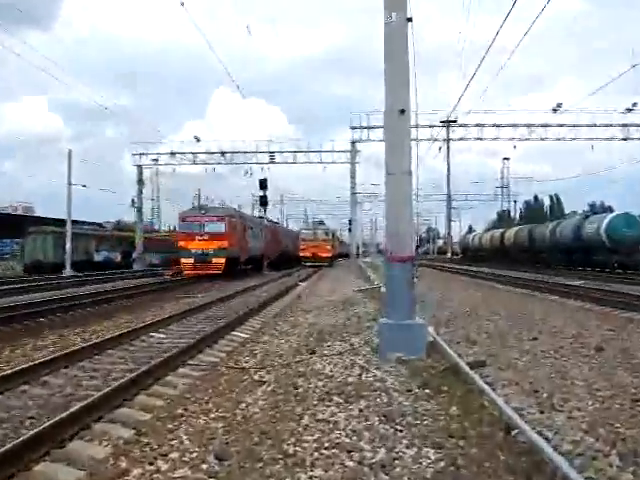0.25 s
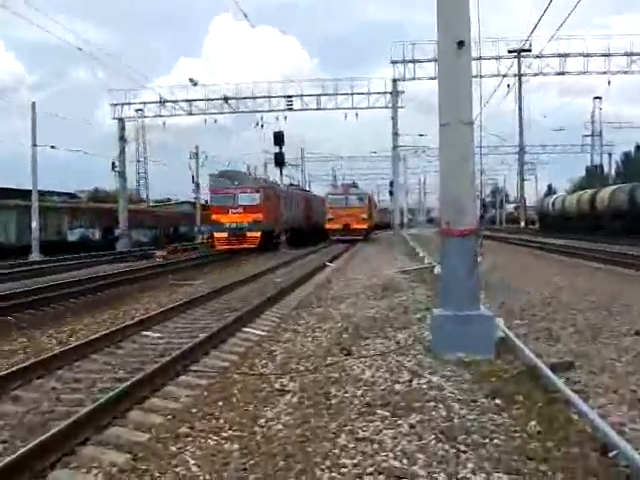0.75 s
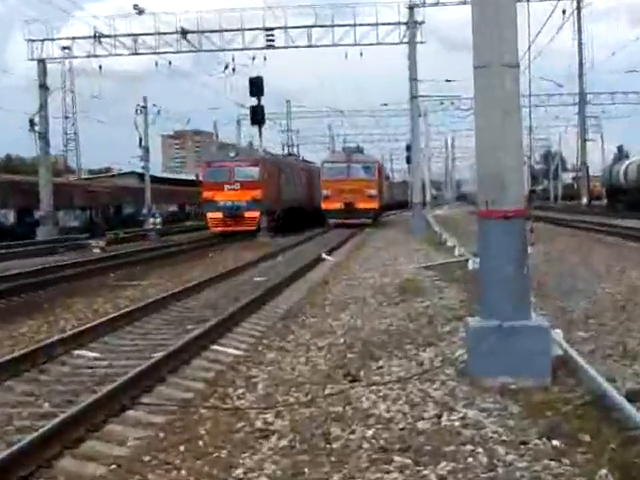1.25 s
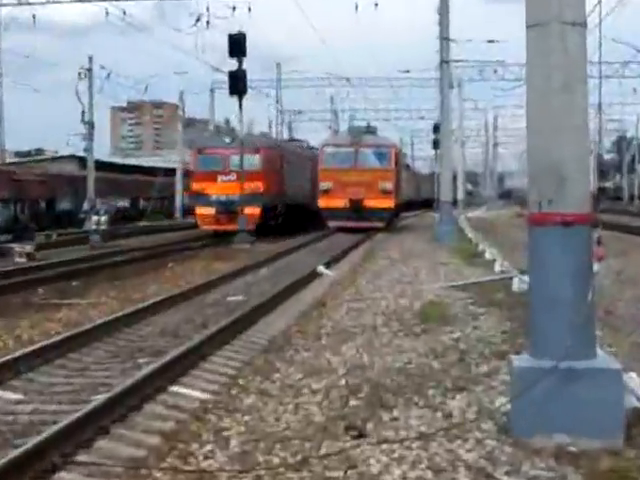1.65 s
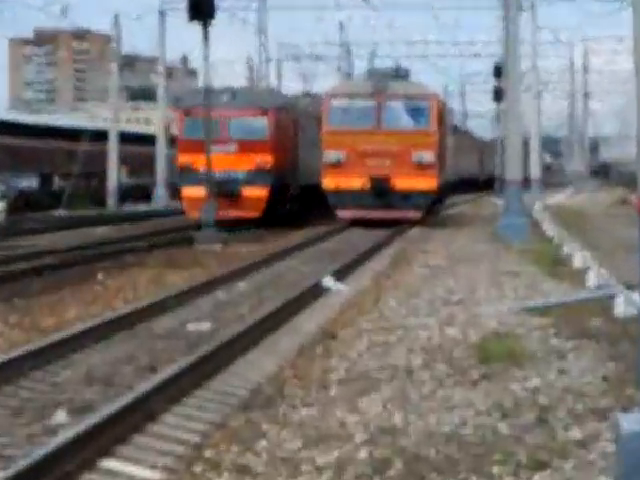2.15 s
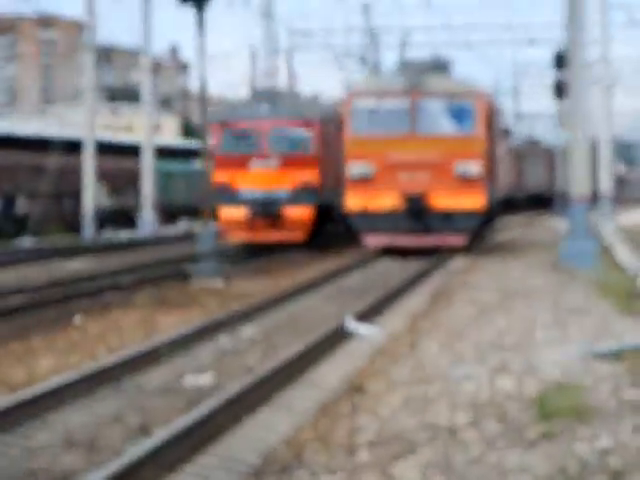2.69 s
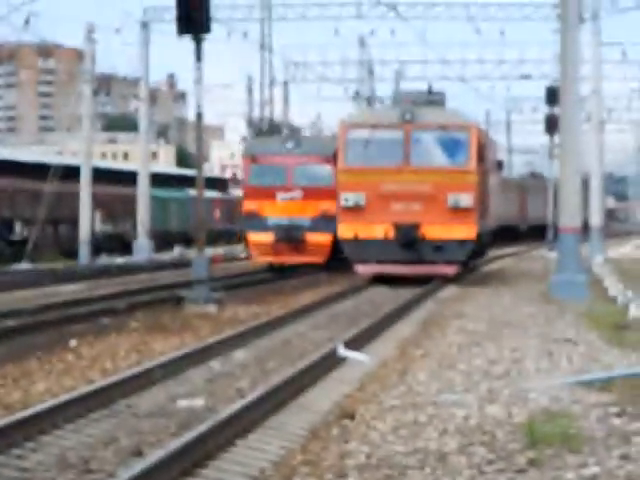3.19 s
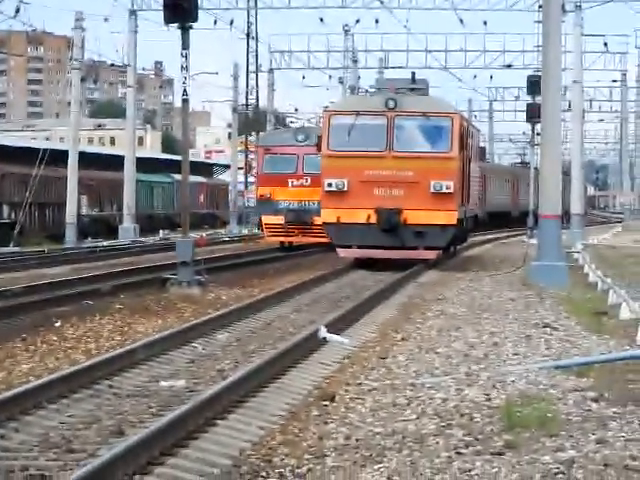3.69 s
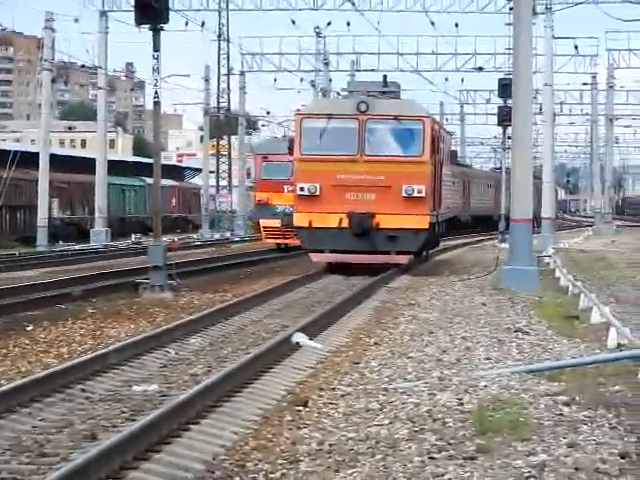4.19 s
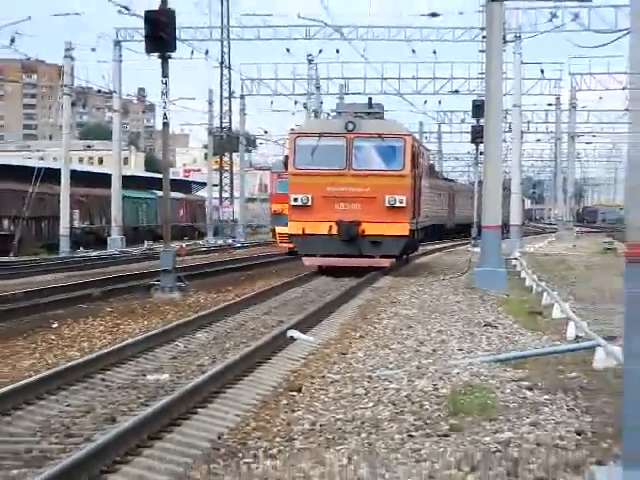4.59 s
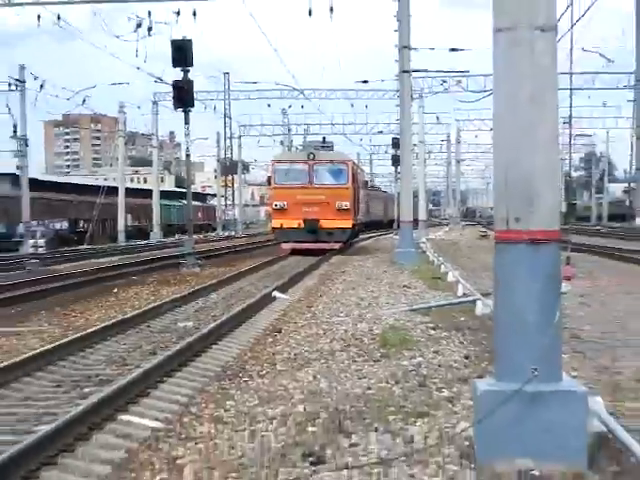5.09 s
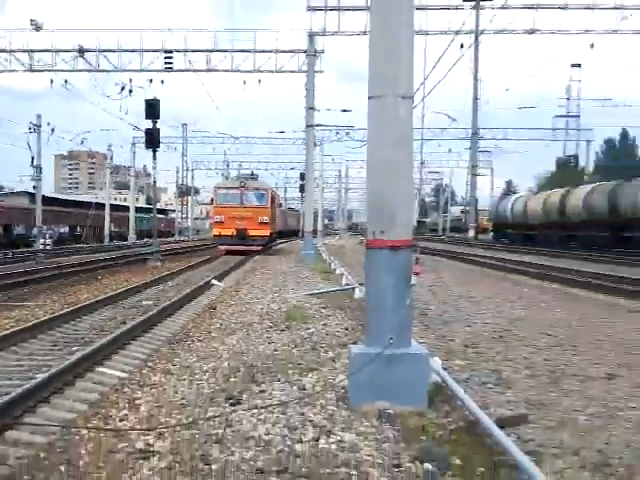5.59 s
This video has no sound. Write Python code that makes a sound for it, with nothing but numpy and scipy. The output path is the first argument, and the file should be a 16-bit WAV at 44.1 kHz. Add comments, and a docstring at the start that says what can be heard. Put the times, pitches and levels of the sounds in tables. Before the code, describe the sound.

Electric trains roar steadily through an open rail yard, with wind buffeting the microphone and a sharp camera-body click midway that briefly dips the sound.

```python
"""Electric trains roll through a station yard, heard from beside the track on a hand-held camera.
Wheels roar, rails sing and hiss over sleeper boom and a low rumble: shaped noises tied to one rolling level.
Midway the camera body clicks, as cracks that ring its modes; gain control ducks all, then slowly recovers.
Gusts buffet the two microphone ports: short swings of pressure amid rough turbulence."""
import sys
import numpy as np
from scipy import signal
from scipy.fft import rfft, irfft
from scipy.io import wavfile
from scipy.ndimage import uniform_filter1d, minimum_filter1d

SR = 44100
rng = np.random.default_rng(int(sys.argv[2]) if len(sys.argv) > 2 else 0)


def wrap_up_sound(samples):
    """Save the sound to the file named by the first command line argument, as 16-bit audio."""
    columns = np.atleast_2d(samples).T
    # keep every value between -1 and 1, then stretch to whole-number steps
    tamed = np.clip(columns, -1, 1)
    steps = np.round(tamed * 32767).astype(np.int16)
    wavfile.write(sys.argv[1], SR, steps)


N = 257972
HOP = 256  # samples between noise frames
FRAME_S = np.arange(N // HOP + 5) * HOP / SR
BIN_HZ = np.fft.rfftfreq(8 * HOP, 1 / SR)


def gain_of(db):
    """Decibels to a factor."""
    return 10 ** (np.asarray(db) / 20)


def evened(x):
    """Scales to an rms of one."""
    return x / np.sqrt(np.mean(x ** 2) + 1e-20)


def drift(frames):
    """Slow random curve over the noise frames, smoothed over so many frames, rms one."""
    return evened(uniform_filter1d(rng.standard_normal(len(FRAME_S)), size=frames))


def read(points, hz):
    """Reads a table on a log-frequency axis."""
    f, value = np.transpose(points)
    return np.interp(np.log(hz + 1), np.log(f + 1), value)


def bumps(rows, hz):
    """The dB curve of a set of resonances or dips."""
    return sum(db / (1 + (2 * (hz - f) / width) ** 2) for f, width, db in rows)


def band(points):
    """A spectrum in dB that falls a further 40 dB per octave above its last point."""
    top_hz = points[-1][0]
    skirt_db = 40 * np.log2(np.maximum(BIN_HZ / top_hz, 1))
    return (read(points, BIN_HZ) - skirt_db)[:, None]


def pan(left_over_right_db):
    """Column of left and right gains for an L-R difference."""
    return gain_of([[left_over_right_db / 2], [-left_over_right_db / 2]])


def add(mix, s, sound):
    """Mixes a stereo sound in at time s."""
    part = mix[:, max(round(s * SR), 0):][:, :sound.shape[1]]
    part += sound[:, :part.shape[1]]


def trains():
    """Rough wheels on rough rail shake cars, sleepers, wheels, rails and contact patch, all by one level."""
    # loudness of the wheels on the rails: t/s, level/dB
    rolling_level = [(0.0, -28), (0.17, -28), (0.37, -26.5), (0.46, -24), (0.53, -25), (0.62, -25),
                     (0.86, -26.5), (1.0, -27.5), (1.15, -28), (2.2, -29), (2.8, -29), (3.1, -27.5),
                     (3.5, -30.5), (3.7, -31.5), (4.0, -31), (4.3, -32), (4.7, -33.5), (5.85, -34.5)]
    cruise_db = -30  # rolling level at which each layer has its base level
    t = np.arange(N) / SR
    swell_db = np.interp(t, *np.transpose(rolling_level)) - cruise_db
    layers = [wheel_roar, rail_singing, contact_hiss, sleeper_boom, car_rumble]
    return sum(layer(t, swell_db) for layer in layers)


def wheel_roar(t, swell_db):
    """Wheels radiate broadband roar with resonances that waver and flare, plus brief surges."""
    # roar spectrum: f/Hz, level/(dB per Hz)
    roar_colour = [(150, -15), (300, -12.5), (380, -4.5), (440, -6.5), (520, 0.5), (610, -0.5), (700, 0),
                   (800, -2), (950, 0), (1100, -5), (1300, -16), (2000, -34)]
    # wheel resonances: f/Hz, width/Hz, height over the roar/dB
    wheel_modes = [(611, 41, 4), (884, 40, 0)]
    # surges: middle t/s, half length/s, lift/dB
    surges = [(0.66, 0.16, 0.5), (3.08, 0.055, 1.3), (3.673, 0.07, 5), (3.9, 0.1, 2.6), (4.365, 0.16, 2.5)]
    waver = 1 + 0.019 * drift(frames=70)  # share of the pitch, rms
    flare = 1 + 0.19 * drift(frames=25)  # share of the height in dB, rms
    colour_db = band(roar_colour) + flare * bumps(wheel_modes, BIN_HZ[:, None] / waver)
    surge_db = sum(db * np.exp(-((t - s) / half) ** 2) for s, half, db in surges)
    return rush(colour_db, -30.5 + swell_db + surge_db, patchy_db=0.57, flutter_db=0.27)


def rail_singing(t, swell_db):
    """Rails sing in the upper midrange, louder while the oncoming train draws near."""
    # singing spectrum: f/Hz, level/(dB per Hz)
    singing_colour = [(700, -34.5), (1100, -0.5), (1350, -2), (1650, 0), (2000, -2), (2250, -1), (2450, -5),
                      (2750, -3.5), (3050, -9), (3350, -9.5), (4200, -15)]
    start_s, rise_s, end_s, fall_s = 2.2, 0.42, 4.64, 0.17
    lift_db, growth_db_per_s = 2, 0.6
    nearing = np.clip(np.minimum((t - start_s) / rise_s, (end_s - t) / fall_s), 0, 1)
    near_db = nearing * (lift_db + growth_db_per_s * (t - start_s))
    return rush(band(singing_colour), -33.5 + 1.16 * swell_db + near_db, patchy_db=0.46, flutter_db=0.5)


def contact_hiss(t, swell_db):
    """The contact patch hisses, progressively shaded as one train slips behind the other."""
    # hiss spectrum: f/Hz, level/(dB per Hz)
    hiss_colour = [(2000, -30.5), (2800, 3.5), (3400, -2), (3900, -1), (4450, -2.5), (5000, 2.5),
                   (5500, 4.5), (5800, -2.5), (6200, -5.5), (6550, -3.5), (7250, -18), (7900, -16.5),
                   (8400, -39), (9500, -61.5)]
    shade_start_s, shade_s, shade_depth_db = 1.23, 2.35, -5
    shade_db = shade_depth_db * np.clip((t - shade_start_s) / shade_s, 0, 1)
    return rush(band(hiss_colour), -34 + 1.11 * swell_db + shade_db, patchy_db=0.5, flutter_db=0.5)


def sleeper_boom(t, swell_db):
    """Sleepers boom in the low midrange, rising 1.9 dB per dB of rolling."""
    # boom spectrum: f/Hz, level/(dB per Hz)
    boom_colour = [(200, -20.5), (290, -1.5), (380, -5), (460, 2), (560, -16.5), (800, -34.5)]
    return rush(band(boom_colour), -41 + 1.9 * swell_db, patchy_db=1.0, flutter_db=0.8)


def car_rumble(t, swell_db):
    """Shaken cars rumble, building at the start and following the rolling only weakly."""
    # rumble spectrum: f/Hz, level/(dB per Hz)
    rumble_colour = [(15, -29.5), (31, -20), (41, -0.5), (54, -0.5), (70, 0), (100, -3.5), (135, -5),
                     (185, -10), (225, -2), (275, -11.5), (325, -7), (420, -21), (700, -37.5)]
    start_db, build_s = -6, 0.26
    build_db = start_db * np.maximum(1 - t / build_s, 0)
    return rush(band(rumble_colour), -29 + 0.37 * swell_db + build_db, patchy_db=0.33, flutter_db=0.0)


def rush(colour_db, level_db, patchy_db, flutter_db):
    """Noise of one colour from down the track, with drifting patches, as the two ports hear it."""
    # left-right likeness: f/Hz, likeness/1
    likeness = [(50, 0.97), (200, 1), (800, 1), (1200, 0.72), (2000, 0.8), (3700, 0.67), (5500, 0.64),
                (8000, 0.35)]
    # phase by which left leads: f/Hz, lead/rad
    lead = [(0, 0.042), (1640, 0.23), (2070, 0.14), (3010, 0.32), (3270, 0.035), (3530, 0.039),
            (4050, 0.35), (4910, 0.1), (5430, 0.034), (5940, 0.55), (7580, 0.4)]
    # stereo balance: f/Hz, L-R/dB
    balance = [(60, -6.5), (100, -1), (170, -4.5), (300, -3.5), (510, -3.5), (870, -3.5), (1480, -1.5),
               (2530, -2.5), (4320, 0), (7380, -1.0)]
    a, b, c, d, patches = rng.standard_normal((len(FRAME_S), len(BIN_HZ), 5)).T
    patches = uniform_filter1d(patches, size=24, axis=0)  # across bins
    patches = evened(uniform_filter1d(patches, size=14, axis=1))  # across frames
    flutter = drift(frames=10)
    same = np.clip(read(likeness, BIN_HZ), -1, 1)[:, None]
    near = a + 1j * b
    far = same * near + np.sqrt(1 - same ** 2) * (c + 1j * d)
    lean = gain_of(read(balance, BIN_HZ) / 2)[:, None]
    turn = np.exp(1j * read(lead, BIN_HZ))[:, None]
    spectra = np.array([near * lean * turn, far / lean])
    spectra *= gain_of(colour_db + patchy_db * patches + flutter_db * flutter)
    noise = signal.istft(spectra, nperseg=8 * HOP, noverlap=7 * HOP)[1][:, :N]
    return evened(noise) * gain_of(level_db)


def camera_clicks(crack_s=0.00045, crack_hz=7000, rise_s=0.00032, aside_db=7):
    """Each knock is a brief crack that rings the body, aside_db less per octave away from its own pitch."""
    # knocks: t/s, peak/dB, knock f/Hz, crack against ring/dB
    clicks = [(2.4005, -12.5, 2000, -28), (2.4145, 6, 1400, -3), (2.4413, 0, 4500, -10)]
    # camera body modes: f/Hz, level/dB, t60/s
    case_modes = [(650, -2, 0.0042), (1100, 3, 0.0057), (2180, -6, 0.005), (2900, -11, 0.0054),
                  (3800, -5, 0.005), (4400, -9, 0.004), (5220, -13, 0.016), (5340, -1, 0.005),
                  (6760, -8, 0.0032)]
    port_slip_cycles = 0.07  # random phase spread of a mode between the ports
    out, t = np.zeros((2, N)), np.arange(SR // 20) / SR
    for s, db, knock_hz, crack_db in clicks:
        ring = np.zeros((2, len(t)))
        for hz, mode_db, t60 in case_modes:
            octaves_off = abs(np.log2(hz / knock_hz))
            envelope = gain_of(mode_db - aside_db * octaves_off - 60 * t / t60)
            phase_cycles = rng.random() + port_slip_cycles * rng.standard_normal((2, 1))
            ring += envelope * np.sin(2 * np.pi * (hz * t + phase_cycles))
        ring *= 1 - np.exp(-t / rise_s)
        crack = rng.standard_normal((2, len(t))) * t * np.exp(-t / crack_s)
        edges_hz = [min(knock_hz, crack_hz) / 2, crack_hz]
        crack = signal.sosfilt(signal.butter(2, edges_hz, "band", fs=SR, output="sos"), crack)
        knock = ring / abs(ring).max() + gain_of(crack_db) * crack / abs(crack).max()
        add(out, s, gain_of(db) * knock / abs(knock).max())
    return out


def wind(skew_rad=0.41, ragged_db=-15, wake=1.94):
    """Each buffet is an eddy crossing the ports: a swing or two of pressure in a wider turbulent wake."""
    # buffets: t/s, level/dB, eddy f/Hz, L-R/dB
    buffets = [(0.449, -20, 85, -3), (0.525, -23, 90, -3), (0.611, -24, 80, -5), (0.742, -22, 165, -1),
               (1.024, -16.5, 197, -2), (1.209, -17, 112, 7), (1.244, -21, 80, -4), (1.317, -22, 80, -16),
               (1.355, -22, 148, -12), (1.384, -21.5, 80, -12), (1.424, -16, 136, -4), (1.439, -15, 78, -7),
               (2.153, -17, 137, -3), (2.329, -20, 105, 1), (2.666, -17, 120, 6), (2.771, -22, 90, 4),
               (3.12, -15.5, 113, 4), (3.138, -21, 70, -4), (3.202, -17, 204, 7), (3.504, -19, 60, -3),
               (3.589, -11.5, 230, 11.5), (3.619, -16.5, 129, 9.5), (3.668, -14.5, 158, 8),
               (3.693, -15.5, 149, 5), (3.735, -18, 215, 14), (3.864, -15.5, 150, -12),
               (3.916, -23, 85, -9.5), (4.305, -20.5, 75, -6), (4.331, -22, 96, -15), (4.372, -21, 90, -3),
               (4.659, -22.5, 125, 2), (4.68, -17, 163, 5), (4.739, -26, 100, -1), (5.012, -25, 170, -2),
               (5.157, -21.5, 60, -1)]
    eddy_cycles = 0.66  # swings from the middle to where the envelope is 1/e
    out, t = np.zeros((2, N)), np.arange(-SR // 10, SR // 10) / SR
    for s, db, hz, pan_db in list(buffets) + puffs():
        turns = hz * t
        phase = 2 * np.pi * rng.random() + skew_rad * rng.standard_normal((2, 1))
        swing = np.cos(2 * np.pi * turns + phase) * np.exp(-(turns / eddy_cycles) ** 2)
        churn = turbulence(hz, count=len(t)) * np.exp(-(turns / (wake * eddy_cycles)) ** 2)
        add(out, s + t[0], gain_of(db) * (swing + gain_of(ragged_db) * churn) * pan(pan_db))
    return out


def puffs(count=30, mid_db=-27, spread_db=4.5, mid_hz=124, pan_db=-6.5):
    """Weak buffets at loosely spaced random moments, in rows like the strong ones."""
    rows = []
    for k, (when, size, pitch) in enumerate(rng.random((count, 3))):
        s = (k + when) * N / SR / count
        db = mid_db + spread_db * (2 * size - 1)
        hz = mid_hz * 2 ** (pitch - 0.5)
        rows.append((s, db, hz, pan_db))
    return rows


def gusts(edge_share=0.79):
    """Longer gusts churn without a break around the buffets, swelling in and dying away."""
    # gusts: start t/s, length/s, level/dB, eddy f/Hz, L-R/dB
    gust_rows = [(0.948, 0.11, -33, 150, -5), (1.131, 0.35, -30, 72, -4), (1.86, 0.2, -33.5, 95, 1),
                 (2.47, 0.32, -29.5, 74, 1.5), (3.052, 0.15, -30, 65, 4), (3.559, 0.26, -30, 145, 4),
                 (3.759, 0.17, -30, 115, -3), (4.259, 0.14, -32, 52, -4), (4.62, 0.12, -35.5, 90, 2)]
    out = np.zeros((2, N))
    for s, length_s, db, hz, pan_db in gust_rows:
        count = round(length_s * SR)
        churn = turbulence(hz, count=count) * signal.windows.tukey(count, np.clip(edge_share, 0, 1))
        add(out, s, gain_of(db) * churn * pan(pan_db))
    return out


def turbulence(hz, count, top_hz=850):
    """Rough pressure noise around hz, dying out above top_hz, unrelated at each port."""
    f = np.fft.rfftfreq(count, 1 / SR)
    colour = (f / hz) ** 2 / (1 + f / hz) ** 3.6 * np.exp(-(f / top_hz) ** 2)
    return evened(irfft(rfft(rng.standard_normal((2, count))) * colour, count))


def scene():
    """Trains, the camera's own clicks and wind."""
    return trains() + camera_clicks() + wind() + gusts()


def gain_control(x, limit_db=-6, recovery_per_s=0.81, hold_s=0.035):
    """Peaks over the limit pull the gain down at once; it holds briefly, then climbs in a straight line."""
    allowed = np.minimum(gain_of(limit_db) / (abs(x).max(0) + 1e-9), 1)
    half = round(hold_s * SR / 2)
    held = minimum_filter1d(allowed, size=2 * half + 1, origin=half)
    creep = np.arange(N) / SR * recovery_per_s
    gain = np.minimum.accumulate(held - creep) + creep
    return x * uniform_filter1d(minimum_filter1d(gain, size=25), size=25)


def record(dry, low_cut_hz=30, edge_hz=11500):
    """Camera notch filters and low cut, gain control, then the band limit."""
    # narrow notches the camera filters out against its zoom motor: f/Hz, width/Hz, depth/dB
    notches = [(2457, 30, -10), (3216, 78, -22), (5054, 79, -11.5)]
    notch_db = bumps(notches, np.fft.rfftfreq(N, 1 / SR))
    notched = irfft(rfft(dry) * gain_of(notch_db), N)
    notched = signal.sosfilt(signal.butter(3, low_cut_hz, "high", fs=SR, output="sos"), notched)
    edge = signal.firwin(511, edge_hz, window=("kaiser", 9), fs=SR)
    return signal.oaconvolve(gain_control(notched), edge[None], "same")


dry = scene()
out = record(dry)
wrap_up_sound(out)
```